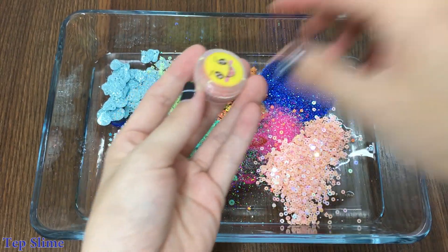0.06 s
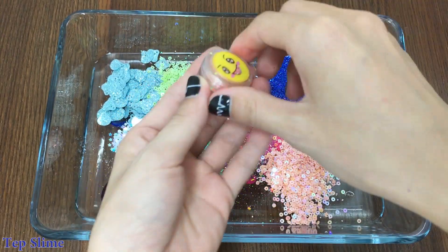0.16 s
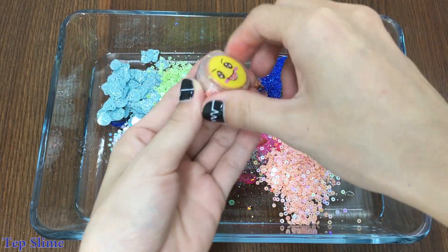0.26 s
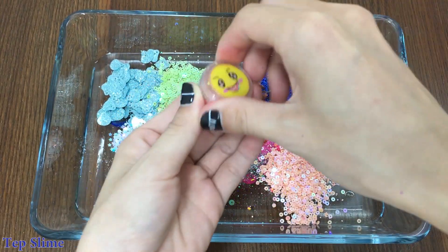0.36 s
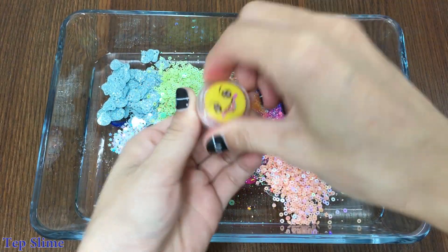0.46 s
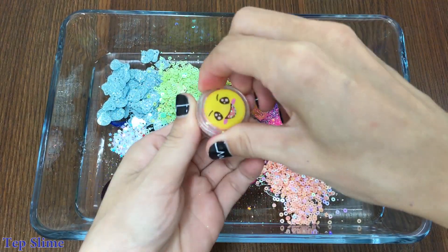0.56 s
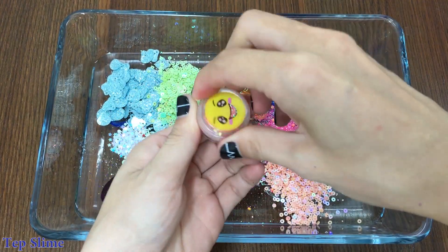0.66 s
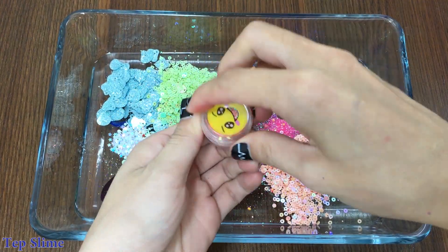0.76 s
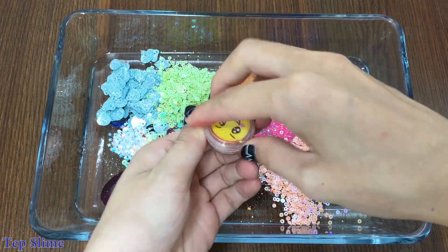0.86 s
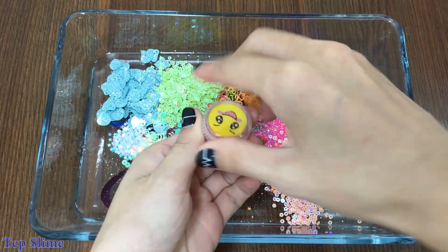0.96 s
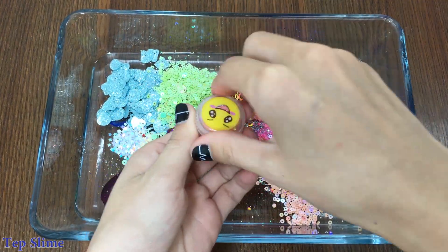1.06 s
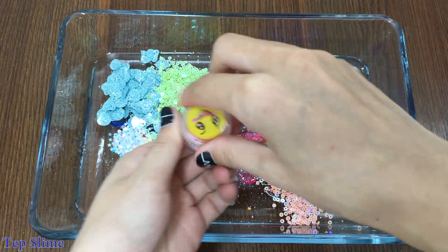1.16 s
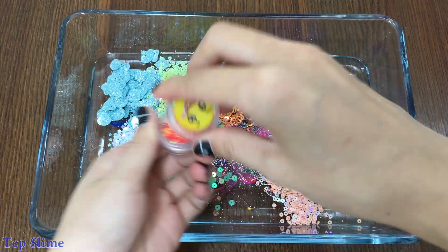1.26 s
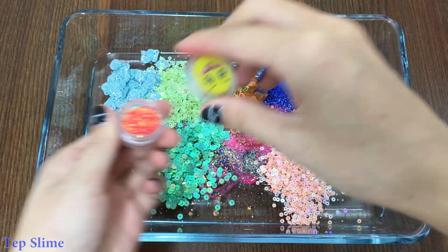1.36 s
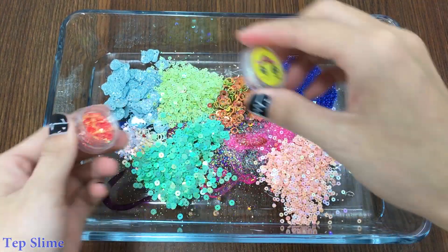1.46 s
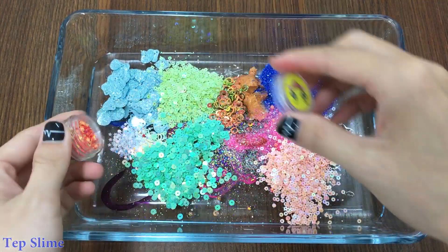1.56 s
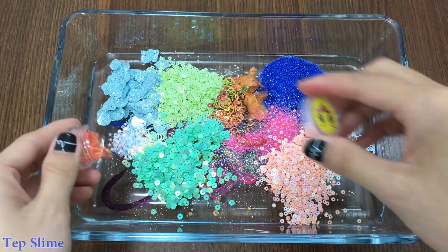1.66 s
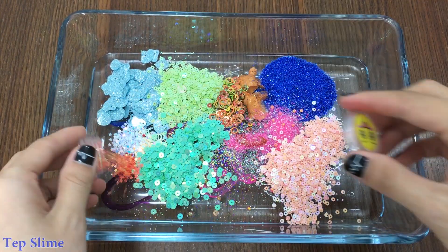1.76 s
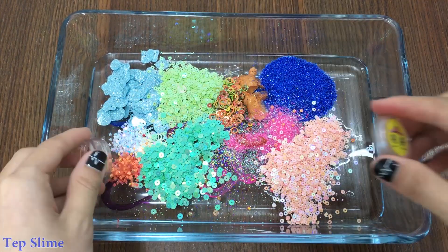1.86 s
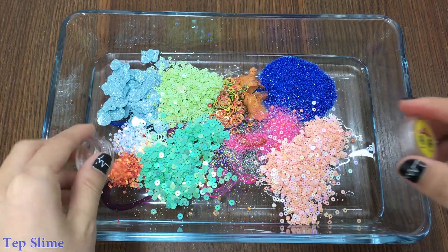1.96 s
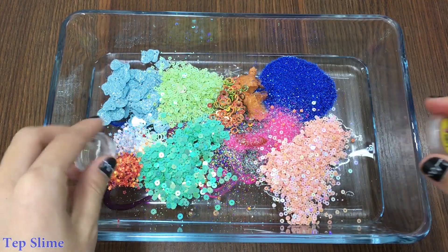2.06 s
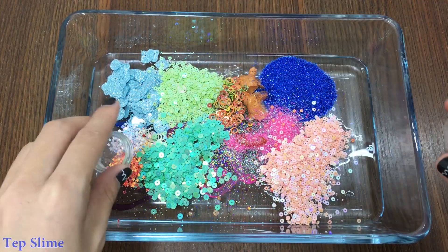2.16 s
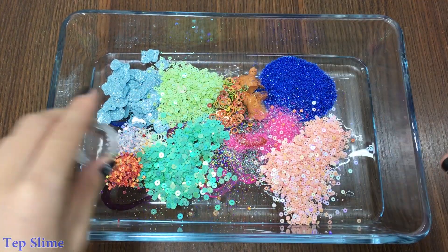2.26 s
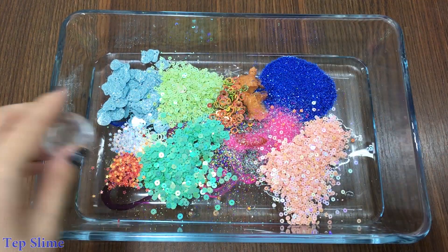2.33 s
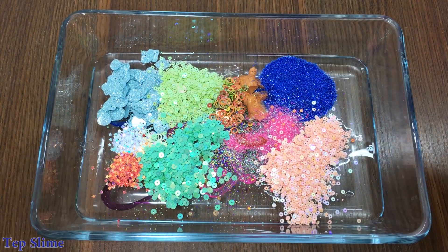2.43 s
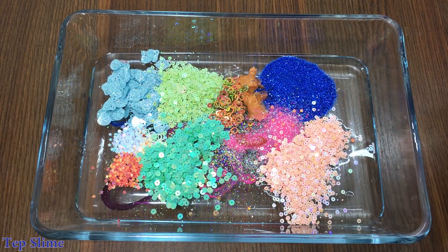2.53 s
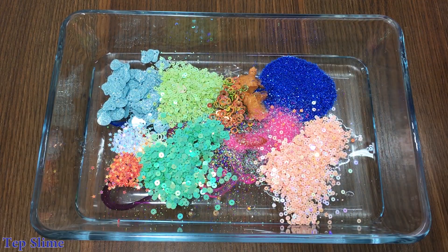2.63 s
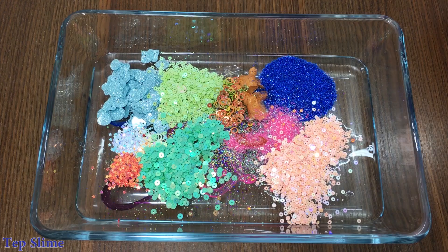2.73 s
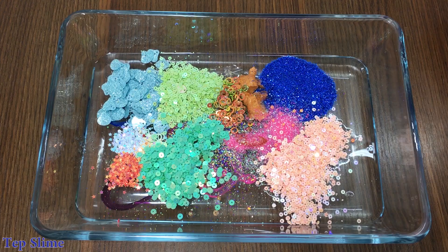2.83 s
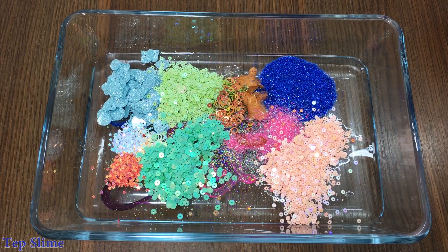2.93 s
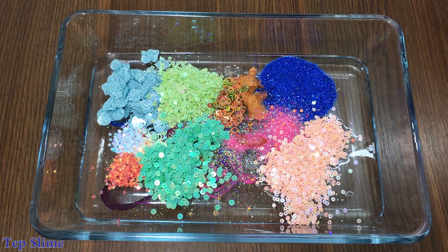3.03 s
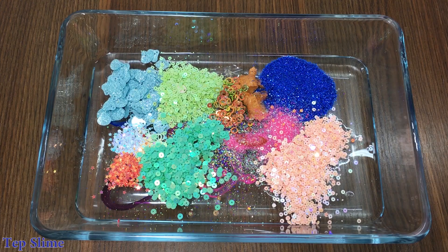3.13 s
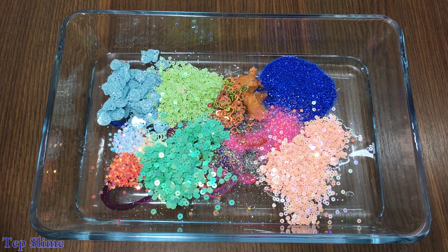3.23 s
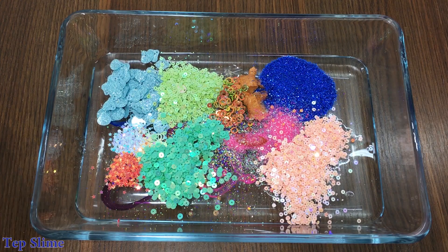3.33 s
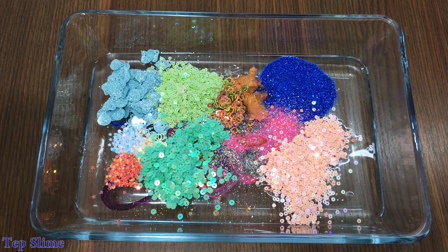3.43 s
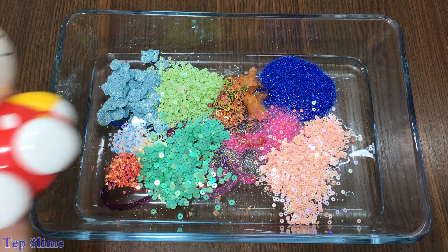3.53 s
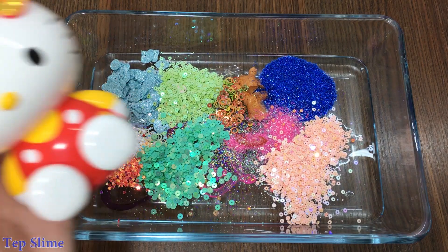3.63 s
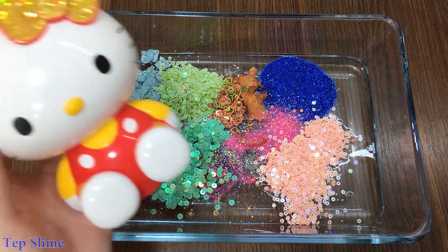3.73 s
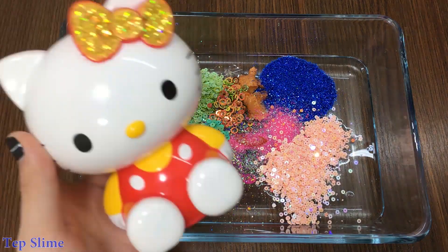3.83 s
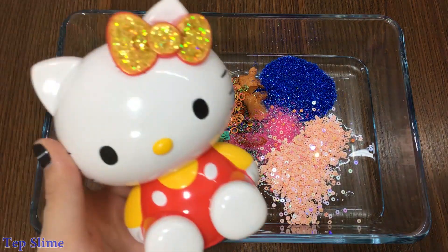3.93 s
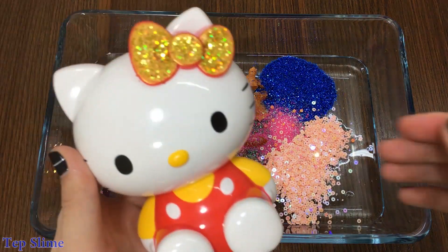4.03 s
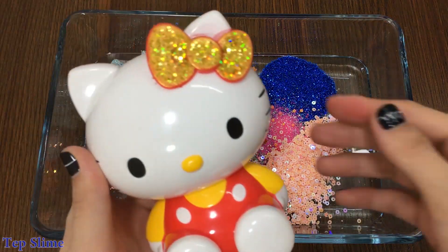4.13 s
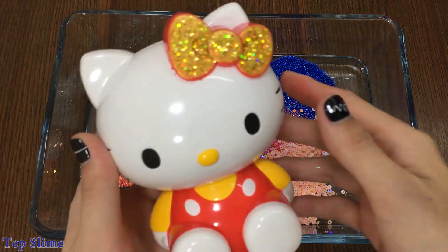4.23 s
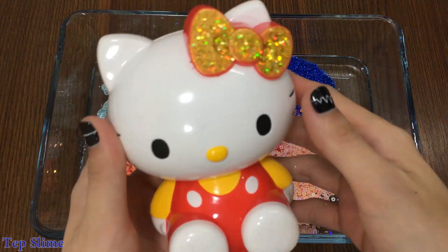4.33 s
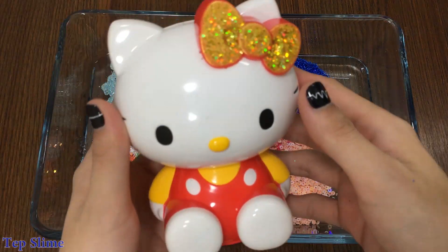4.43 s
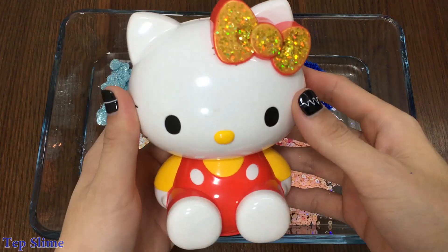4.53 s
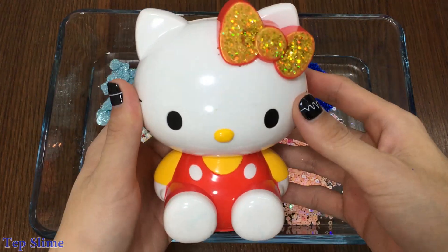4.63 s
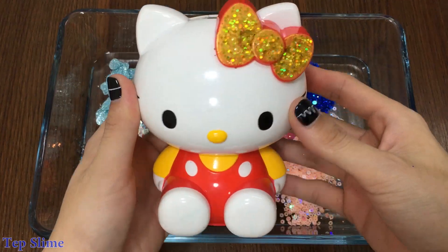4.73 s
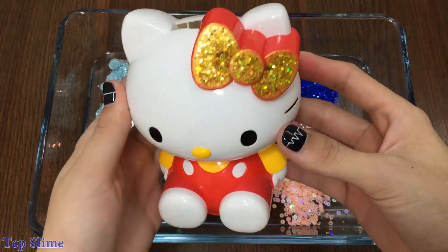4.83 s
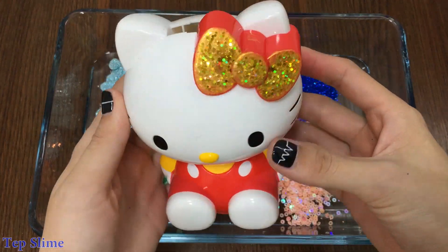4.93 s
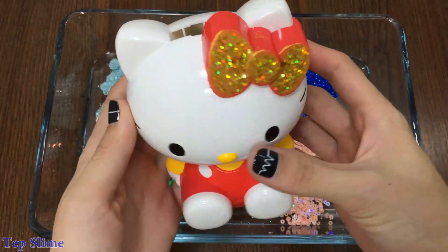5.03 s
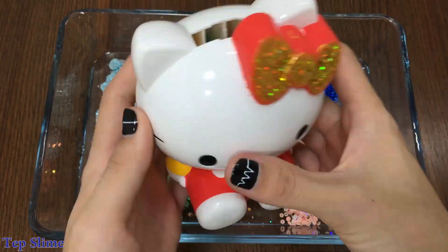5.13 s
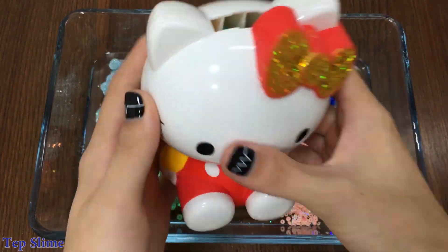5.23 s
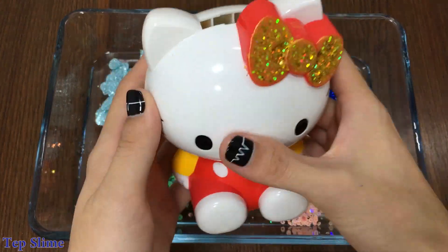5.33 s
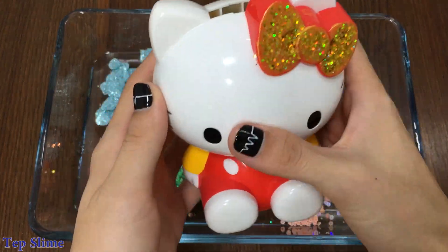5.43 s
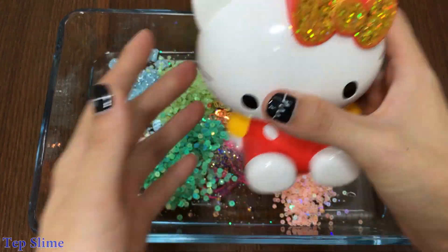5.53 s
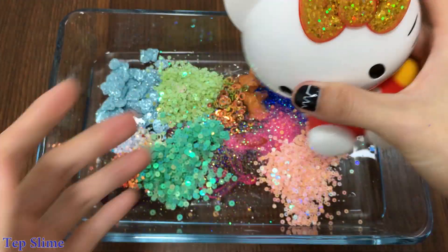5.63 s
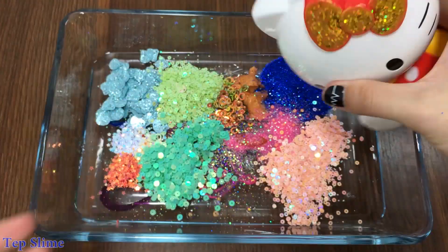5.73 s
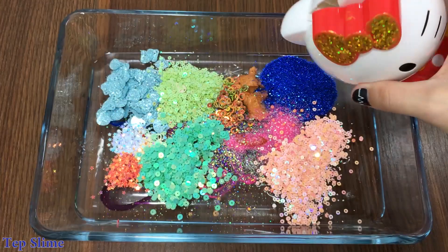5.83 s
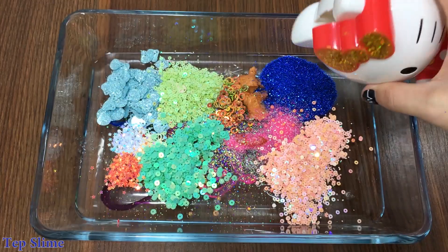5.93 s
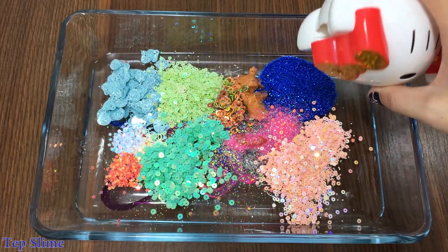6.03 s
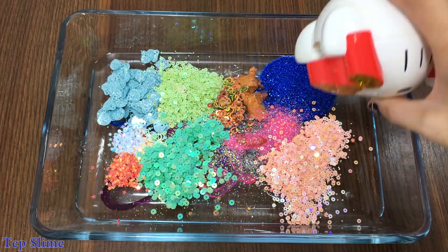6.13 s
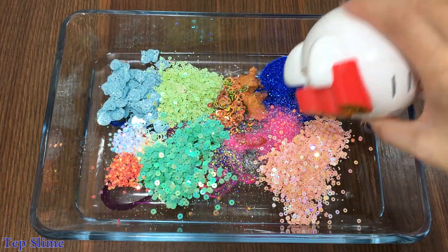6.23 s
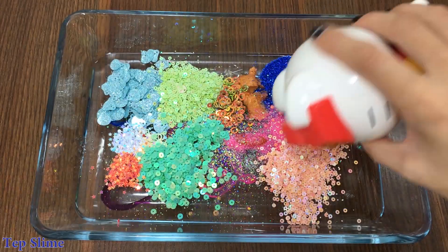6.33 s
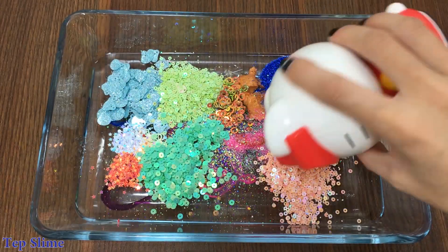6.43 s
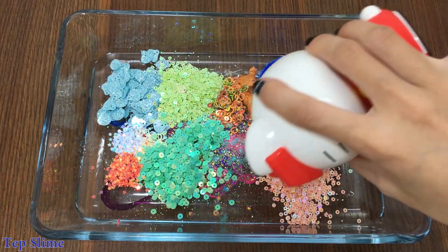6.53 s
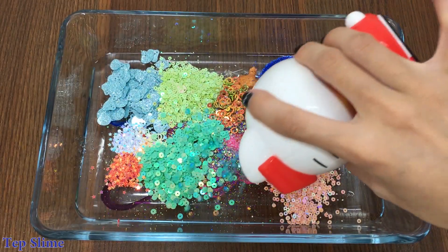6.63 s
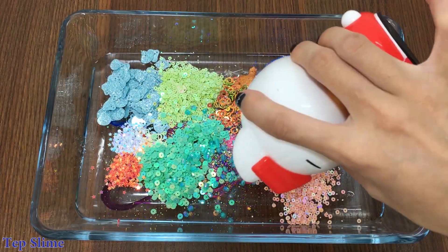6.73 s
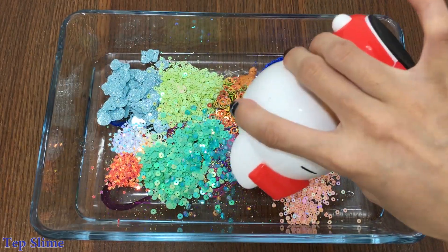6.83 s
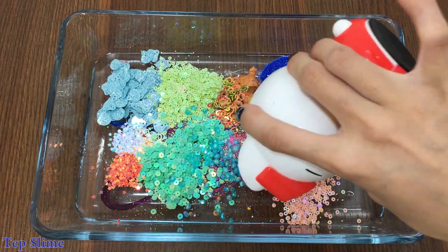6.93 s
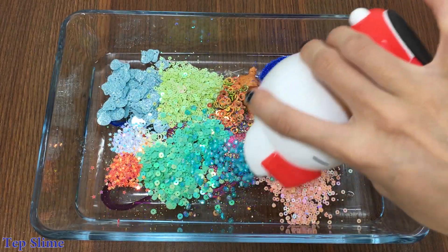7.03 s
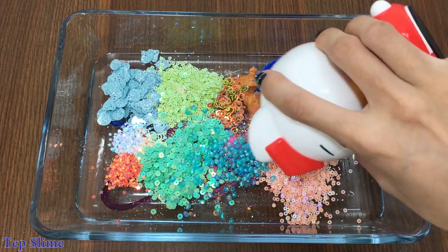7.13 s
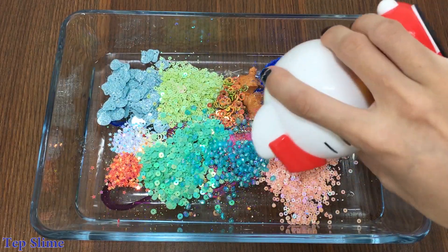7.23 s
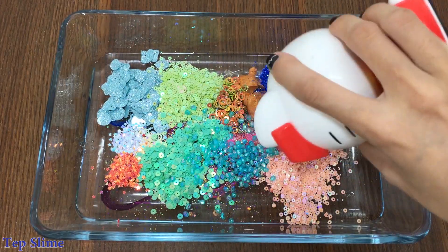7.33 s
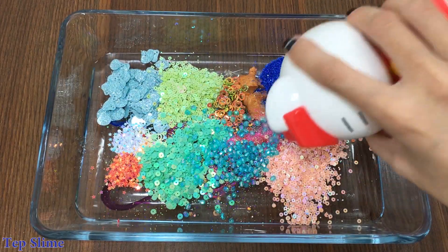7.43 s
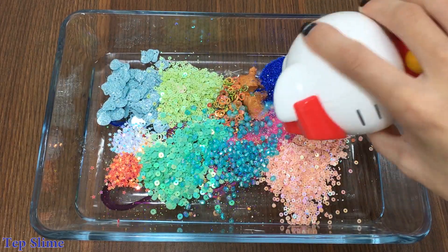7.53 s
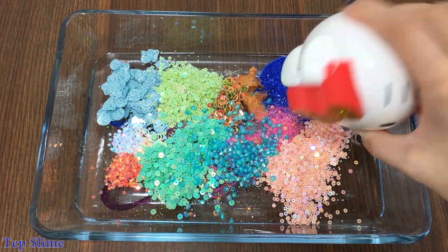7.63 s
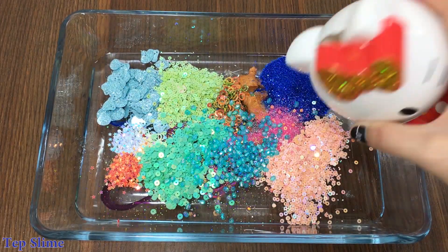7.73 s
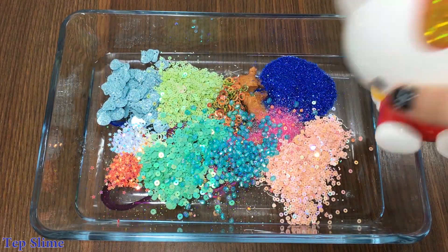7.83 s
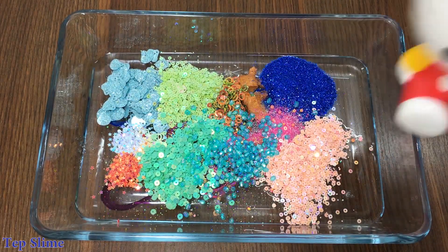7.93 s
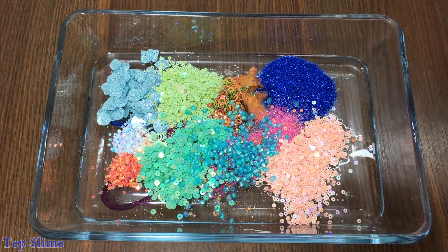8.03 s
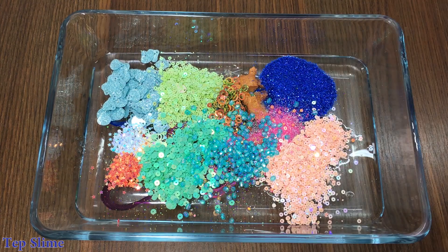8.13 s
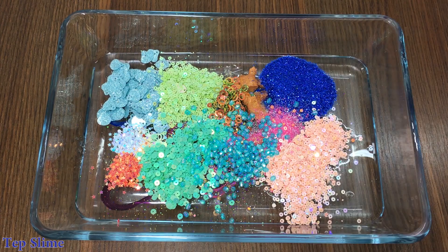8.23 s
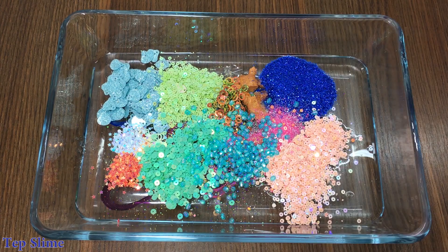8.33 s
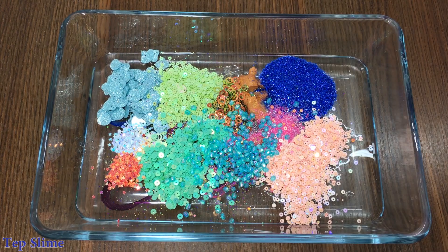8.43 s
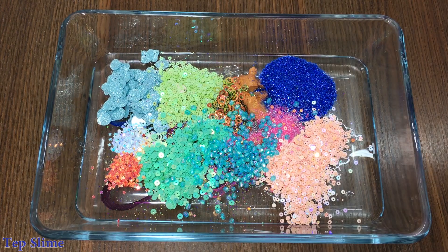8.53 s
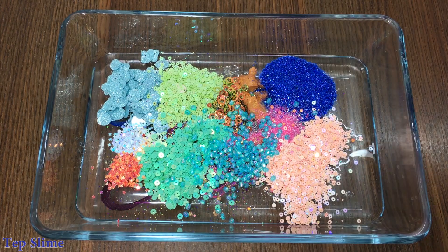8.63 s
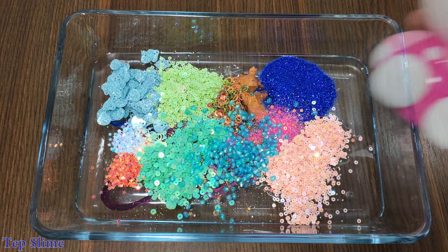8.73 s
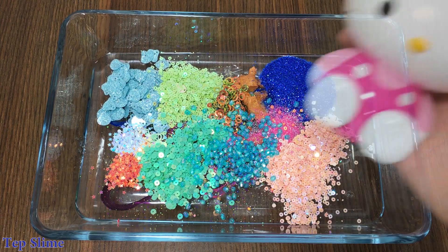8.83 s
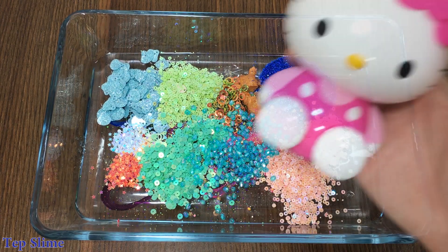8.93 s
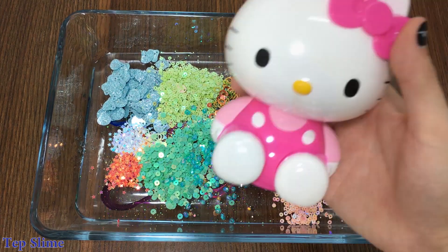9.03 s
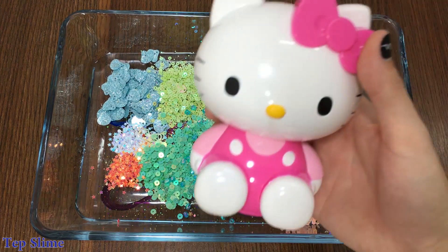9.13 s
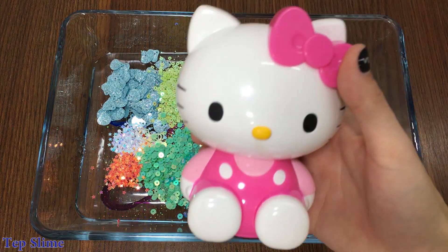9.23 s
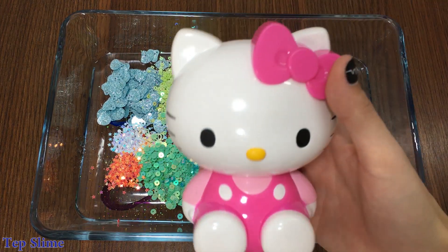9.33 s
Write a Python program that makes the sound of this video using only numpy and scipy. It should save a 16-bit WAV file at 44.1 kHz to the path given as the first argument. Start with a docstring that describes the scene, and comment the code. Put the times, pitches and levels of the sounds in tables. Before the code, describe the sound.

Small plastic lid clicks, followed by beads sliding and rattling inside hollow plastic figures and spilling out in a bright, close rush.

```python
"""A dull rustle fades. Fingers rub on a small plastic jar and twist its lid, which sticks and slips in
snaps that excite the cavity; sequins tick out. From about 2.6 s hollow plastic figures full of beads are
lifted, then turned, shaken and emptied close by: random impacts drive the resonances of the shell, merging
into a rush from which hard knocks stand out. Throughout, a small hard room reverberates over a low
rumble, hum and hiss."""
import sys
import numpy as np
from scipy import signal
from scipy.fft import rfft, irfft, next_fast_len
from scipy.io import wavfile
from scipy.ndimage import uniform_filter1d

SR = 44100
rng = np.random.default_rng(int(sys.argv[2]) if len(sys.argv) > 2 else 0)


def to_wav(sig):
    """Store sig (one row per channel, or 1-D mono) as 16-bit WAV at the path in sys.argv[1].

    Samples outside -1..1 are clipped; the rate is SR.
    """
    pcm = np.clip(np.atleast_2d(sig), -1, 1) * 32767
    pcm = np.round(pcm).astype(np.int16)
    wavfile.write(sys.argv[1], SR, pcm.T)  # frames by channels


N = 413216


def bead_stream(level_db, cavity_db, body_db, top_db, shell):
    """Shot noise: beads strike 30 spots on the wall at random, more often as the level rises."""
    count = len(level_db)
    hits_per_s = np.clip(3500 * gain_of(0.2 * (level_db + 34.5)), 100, 20000)
    strength = gain_of(3.74 * np.minimum(rng.exponential(1, count), 4))
    impulses = strength * (rng.random(count) < hits_per_s / SR) / np.sqrt(hits_per_s)
    spot = rng.integers(0, 30, count)
    force = sum(signal.oaconvolve(impulses * (spot == k), impact(t60=0.024))[:count] for k in range(30))
    low, middle, top = shell_bands(force, shell)
    bass, cavity, body = map(evened, split(low, 900, 1450))
    low = gain_of(-32) * bass + gain_of(cavity_db) * cavity + gain_of(body_db) * body
    taper = signal.windows.tukey(count, 1300 / count)
    return taper * gain_of(level_db) * (low + evened(middle) + gain_of(top_db) * evened(top))


# One curve a movement; cavity and body are relative to the middle band:
# (time [s], level [dB], air cavity [dB], shell body [dB])
SLIDE_CURVES = [
    [(2.88, -82, 4, -21), (2.884, -75, -7, 1), (3.034, -57, -19, -8), (3.22, -41, -19, -15),
     (3.272, -44.5, -18, -11.5), (3.4, -42.5, -17.5, -12), (3.424, -52, -32, -13), (3.68, -73.5, -9, -4)],
    [(4.6, -78, -1, -11), (4.612, -68, -1, -11), (4.626, -67, -17, -21), (4.636, -72, -8, -9),
     (4.662, -52, -16, -7), (4.682, -63, -17, -10), (4.822, -77, -9, -5), (4.86, -68, -19, -11)],
    [(5.39, -67.5, 5, -11), (5.4, -54.5, -11, -12), (5.436, -26.5, -16, -12.5), (5.512, -14, -16, -15),
     (5.588, -41, -14, -10.5), (5.86, -63, -8, -1), (5.87, -51, -9, -11)],
    [(7.9, -70, -19, -2), (7.958, -35, -29, -5.5), (8.052, -23.5, -12.5, -12.5),
     (8.094, -20.5, -20.5, -13.5), (8.192, -25, -15.5, -11.5), (8.266, -40, -23, -12),
     (8.326, -48.5, -13, -5), (8.37, -52, -16, -11)],
    [(8.62, -54, -13, -5), (8.642, -31.5, -27.5, -21), (8.752, -42, -9, -10.5), (8.784, -40, -18, -12),
     (9.01, -50, -13, -12.5), (9.056, -65, -11, -5.5), (9.126, -63.5, -10, -10), (9.2, -89, -5, -11)],
    [(5.85, -59, -26, -18), (5.87, -54.5, -5, -3), (5.96, -59, -20, -20), (6.05, -45, -20, -4.5),
     (6.27, -36, -36, -15), (6.36, -29.5, -30, -10), (6.45, -30, -29.5, -14), (6.74, -27.5, -20.5, -12),
     (6.93, -31, -20, -13.5), (7.11, -40, -26, -12), (7.13, -34.5, -18.5, -12.5), (7.58, -46.5, -21, -9.5),
     (7.62, -40.5, -19, -1.5), (7.71, -52, -10, -27), (7.92, -61, -16, -3)],
]
# Top band of each movement: (relative level [dB])
SLIDE_TREBLE = [-5.5, -18, -4.5, -4.5, -5.5, -4]
def bead_slides():
    """Sustained excitation: beads slide along the shell for as long as the figure moves."""
    for curve, top_db in zip(SLIDE_CURVES, SLIDE_TREBLE):
        times, *columns = np.transpose(curve)
        t = np.arange(times[0], times[-1], 1 / SR)
        levels_db = [np.interp(t, times, column) for column in columns]
        yield times[0], bead_stream(*levels_db, top_db, shell_response(times[0]))


# Jolts of the hand: (peak time [s], level [dB], rise [s], hold [s], fall [s])
JOLTS = [(2.978, -57, .02, .004, 0.046), (3.066, -49, 0.032, .004, 0.036), (3.22, -60, .1, .01, .1),
         (3.732, -64.5, .12, .02, 0.3), (9.1, -63, .03, .004, .06), (6.588, -27.5, 0.1, .05, 0.77),
         (4.545, -66, 0.044, .005, .04), (4.972, -61.5, 0.25, 0.059, 0.18),
         (5.114, -62, 0.026, .005, 0.043), (5.15, -77, .03, .005, .06), (5.9, -42.5, 0.011, 0.0027, 0.025),
         (6.325, -36, 0.025, .02, 0.25), (7.042, -32, 0.042, 0.0081, 0.13),
         (7.149, -24, 0.027, 0.0038, 0.063), (7.24, -29.5, 0.017, 0.0069, 0.089),
         (7.274, -29, 0.05, 0.016, 0.15), (7.406, -30.5, .08, 0.0069, 0.04),
         (7.507, -26.5, 0.036, .005, .07), (7.624, -28.5, 0.13, 0.0077, 0.22),
         (7.76, -43.5, 0.033, .004, 0.035), (8.395, -42.5, 0.045, .005, 0.093),
         (8.449, -52, .1, 0.069, 0.12), (8.566, -32, 0.012, 0.0023, 0.039)]
def bead_rushes():
    """Inertia: every jolt throws a short rush of beads against the wall."""
    for start, end in ((2.5, FAR_UNTIL_S), (FAR_UNTIL_S, N / SR)):
        t = np.arange(start, end, 1 / SR)
        level_db = np.max([swell(t, *jolt) for jolt in JOLTS], axis=0)
        shell = shell_response(start)
        yield start, bead_stream(level_db, cavity_db=-25, body_db=-21.5, top_db=-6.5, shell=shell)


# Hard single hits: (time [s], level [dB], spot frequency [Hz], shell body [dB], top band [dB])
BEAD_KNOCKS = [(2.6534, -39.5, 3740, 5, -4), (2.9761, -41, 5940, 0, 2), (3.0235, -30, 10200, -9, 2),
               (3.058, -24.5, 13800, -3, -8), (3.0979, -24, 14200, 7, -9), (3.1246, -31, 8290, -3, 4),
               (3.1577, -27.5, 6930, 7, -5), (3.1872, -25.5, 5290, -3, -3), (3.2121, -26, 8900, -8, 6),
               (3.3297, -25, 9200, 3, 2), (3.3444, -24.5, 8730, 5, 2), (3.3667, -29, 13600, -3, 4),
               (3.3949, -23, 8650, 2, 3), (3.4411, -25.5, 8620, -9, 2), (3.498, -24.5, 14600, -3, -5),
               (3.54, -33.5, 7900, 0, 2), (4.623, -45, 5950, 10, 2), (4.6558, -38, 5070, 2, -8),
               (4.718, -48, 5930, 9, -4), (5.1084, -42, 8330, -1, 2), (5.1517, -46.5, 15000, -6, 0),
               (5.3537, -51, 4460, -3, -2), (5.404, -37, 8730, 3.5, 5.5), (5.4282, -24, 9980, 9.5, 0.5),
               (5.435, -17, 7150, 0, -1), (5.4435, -15.5, 6440, 3.5, 2.5), (5.6545, -39, 7080, -3, 0),
               (5.874, -33, 8230, 4, -4), (5.9015, -23, 10000, 0, 3), (5.9239, -32, 3840, -1, -3),
               (5.9587, -32, 10600, -7, 2), (5.976, -37, 8580, 0, 2), (6.003, -25, 8840, 5, 0),
               (6.0253, -21, 13300, -9, 0), (6.0438, -18.5, 13200, -8, -4),
               (6.0657, -12.5, 14000, 2.5, -1.5), (6.0994, -25.5, 6660, -8.5, 2), (6.118, -29, 6720, 11, 6),
               (6.134, -24, 7210, 0, 4), (6.1549, -19, 12800, 0, -4), (6.1887, -20.5, 7400, 4, 7),
               (6.2053, -17, 8550, 2, 4), (6.224, -19, 10200, 2, -1), (6.2574, -21, 7360, -12, 8),
               (6.2777, -22, 9920, 8, 6), (6.2926, -22.5, 14900, -18, 8), (6.303, -12.5, 7450, 3, 7),
               (6.3262, -14, 7300, -1, 4), (6.39, -28, 13700, -5, 4), (6.43, -15, 9700, -2, 2),
               (6.5365, -15, 6310, 2, 2), (6.5737, -15, 12300, 5, 3), (6.5864, -14, 9990, -6, 0),
               (6.6746, -14, 7580, -3, 2), (6.816, -19, 10200, -1, 2), (6.918, -16, 10200, 1, -3),
               (7.0322, -15.5, 10200, -18, 3), (7.0843, -24, 11800, -10.5, 7), (7.124, -25, 5910, 8, 4),
               (7.135, -23, 9600, 1, 2), (7.1504, -14, 9900, -12, 5), (7.233, -14.5, 6500, -1.5, 0),
               (7.2669, -18, 6300, -1, 2), (7.2842, -14, 6050, -7.5, 7), (7.3711, -21, 9300, -10.5, -2),
               (7.3988, -17.5, 6260, -3, 9), (7.463, -27, 3780, -6, 6), (7.4881, -20.5, 10200, 2, -2),
               (7.5048, -16, 10200, -13, 2), (7.5523, -23.5, 4550, -2, 2), (7.5882, -27, 4500, -5, 5),
               (7.6225, -12, 5770, -7, 4), (7.66, -17, 8540, -8, 5), (7.7149, -26, 6730, -8, 2),
               (7.7572, -23.5, 5640, -6, 6), (7.797, -39, 12100, 1, 6), (7.8385, -33, 7340, 0, 2),
               (7.868, -35, 10900, 3, 2), (7.9189, -32.5, 6670, -13.5, -2), (7.9398, -28, 6130, 5, -2),
               (7.959, -26.5, 6980, -4, 2), (8.3723, -31.5, 10700, 14, 2), (8.3993, -24, 13900, -4, 7.5),
               (8.4192, -25.5, 3530, 3.5, 2), (8.4512, -29.5, 5910, 3, -4), (8.4782, -30, 10500, 2, 3),
               (8.5064, -46, 4650, 11, 2), (8.5245, -37, 4570, 3, 4), (8.5651, -26.5, 8040, 18, 2),
               (8.5916, -31, 8990, 13, 2), (8.6164, -30, 8920, 5.5, 2), (8.6348, -22, 7800, -3, 7),
               (8.7075, -26, 10200, -7, 4), (8.766, -39, 8020, -8, 3), (8.7849, -23, 8080, -14, 2),
               (8.8424, -22.5, 7640, 4, -2), (8.9094, -25, 7160, 0.5, 2), (8.9647, -24, 8250, 5, 3.5),
               (9.011, -28, 13000, 5, -5), (9.1166, -41, 4260, -6, 0)]
def bead_knocks():
    """Point excitation: the spot that a bead strikes favours its own band of frequencies."""
    for start, db, spot_hz, body_db, top_db in BEAD_KNOCKS:
        shell = shell_response(start)
        force = impact(t60=0.025)
        force += 1.64 * band(force, 0.877 * spot_hz, 1.122 * spot_hz)
        body, middle, top = shell_bands(force, shell)
        knock = gain_of(body_db) * body + middle + gain_of(top_db) * top
        yield start, gain_of(db) * knock / abs(middle + top).max()


def impact(t60):
    """Contact transient: a quick tick, then scattered waves damped in the wall."""
    t = np.arange(2600) / SR
    decay = gain_of(-60 * t / t60) + np.exp(-t / 0.0015)
    attack = 1 - np.exp(-t / 0.00039)
    return rng.standard_normal(len(t)) * decay * attack


# Broad spectrum of the shell, close by and further off at another angle: (frequency [Hz], level [dB])
NEAR_SPECTRUM = [(260, -66.5), (450, -26), (908, -22), (1360, -10), (1490, -9), (1800, -5.5), (2230, -5.5),
                 (2650, -11.5), (3500, -6.5), (4430, -2.5), (5460, -5), (10100, 1.5), (11300, -4.5),
                 (14800, -4.5), (16000, -9)]
FAR_SPECTRUM = [(410, -64), (700, -19), (852, -20), (1600, -9), (2840, -12), (3740, -6.5), (7690, -3),
                (8990, 2.5), (11400, -3.5), (14000, -1), (16000, -5)]
# Shell modes: (frequency [Hz], bandwidth [Hz], level [dB])
SHELL_RESONANCES = [(1080, 12, 4), (1293, 170, -2), (1754, 54, 2.5), (1960, 50, -10.5), (2218, 22, 5.5),
                    (3487, 100, 2), (4500, 120, -4.5), (5950, 93, 2.5), (6430, 77, 1.5), (7120, 270, -1),
                    (7980, 60, 2), (8550, 140, -7.5), (8750, 29, -8.5), (10200, 310, -20),
                    (12400, 230, -0.5), (14200, 88, -1.5)]
FAR_UNTIL_S, GRIP_DB, GRIP_ABOVE_HZ = 4.0, -5, 1900
def shell_response(time_s):
    """Modal resonance: the hollow shell radiates little bass; the grip randomly weakens upper modes."""
    hz = abs(np.fft.fftfreq(4096, 1 / SR))
    colour = gain_of(value_at(FAR_SPECTRUM if time_s < FAR_UNTIL_S else NEAR_SPECTRUM, hz))
    modes = 0
    for mode_hz, width, db in SHELL_RESONANCES:
        grip_db = GRIP_DB * rng.random() * (mode_hz > GRIP_ABOVE_HZ)
        modes += gain_of(db + grip_db) / (1 + (2 * (hz - mode_hz) / width) ** 2)
    radiation = 0.23 + 1.2 / (1 + (930 / (hz + 1)) ** 12)
    log_gain = np.log(colour * (1 + modes) * radiation + 1e-5)
    minimum_phase = -signal.hilbert(log_gain).imag
    return np.fft.ifft(np.exp(log_gain + 1j * minimum_phase)).real[:2048]


def shell_bands(force, shell):
    """Forced vibration: force convolved with the shell's response, as body, middle and top bands."""
    return split(signal.oaconvolve(force, shell)[:len(force)], 2900, 11200)


# Slips of the lid: (time [s], level [dB], cavity frequency [Hz], crack [dB], crack tilt [dB/octave],
# cavity 60 dB decay time [s])
LID_SLIPS = [(0.663, -45.5, 5100, -8, 14, 0.0089), (0.671, -33, 5250, -21, -3, 0.0044),
             (0.761, -51, 1470, -9, -5, 0.005), (0.817, -48, 1590, -7, -5, 0.012),
             (0.825, -42, 1410, -6, 0, 0.0041), (0.867, -49, 1610, -14, 10, 0.0044),
             (1.0217, -52, 1680, -3, 2, 0.0065), (1.071, -34.5, 1620, -13, -7, 0.004),
             (1.1497, -50, 1620, -7, -14, 0.012), (1.2512, -15, 1724, -5.5, 0, 0.0064),
             (1.293, -36, 1870, -10, -2, 0.0064), (1.311, -38, 1930, -14, 4, 0.005),
             (1.37, -25, 2390, -8.5, -6.5, 0.0056), (1.391, -35.5, 3800, -12, -2, 0.0038)]
# Modes of the lid: (frequency [Hz], level [dB])
LID_MODES = [(1300, -43), (2000, -3), (2900, 5), (3400, -2.5), (4600, -1), (5600, 2), (7250, -3),
             (8950, -7), (10400, -3.5), (13200, -28), (15000, -6)]
def lid_snaps():
    """Stick-slip friction: each release rings the jar's cavity and the heavily damped lid modes."""
    t = np.arange(600) / SR
    for start, db, cavity_hz, crack_db, tilt_db, t60 in LID_SLIPS:
        attack = 1 - np.exp(-t / 0.00037)
        cavity = np.sin(2 * np.pi * cavity_hz * t) * gain_of(-60 * (t / t60) ** 2) * attack
        detune = rng.uniform(0.91, 1.127, len(LID_MODES))
        crack = 0
        for k, (hz, mode_db) in enumerate(LID_MODES):
            envelope = gain_of(mode_db + tilt_db * np.log2(hz / 3000) - 0.37 * hz * t)
            crack += (-1) ** k * envelope * np.sin(2 * np.pi * hz * detune[k] * t)
        snap = cavity + gain_of(crack_db - 60 * t / 0.0059) * crack
        yield start, gain_of(db) * band(snap, 690, 17800)  # a small jar radiates no bass


# Soft grainy hisses: finger rubs, and at 1.269 s the ringing tail after the loudest lid snap:
# (peak time [s], level [dB], rise [s], hold [s], fall [s], middle band [dB], low band [dB])
GRAINY_HISSES = [(0.317, -66.5, .08, 0.018, .25, -14, -28), (0.664, -48, 0.0042, 0.0023, 0.082, -8, -4),
                 (0.836, -69.5, 0.075, .02, 0.63, 0.5, 5), (1.269, -72, .01, 0.13, .1, 3, 13),
                 (1.391, -49.5, .008, .002, .03, -13, -8), (1.94, -68, .1, 0.23, .1, -13, -31)]
def grainy_hisses():
    """Amplitude-modulated noise: finger rubs, and the ringing tail after the loudest lid snap."""
    for peak_s, *shape, middle_db, low_db in GRAINY_HISSES:
        t = np.arange(peak_s - 0.2, peak_s + 0.6, 1 / SR)
        white = rng.standard_normal(len(t))
        grain_db = 2 * evened(uniform_filter1d(rng.standard_normal(len(t)), 150))
        grainy = band(white * gain_of(grain_db), 1200, 17000)
        low, middle, high = map(evened, split(grainy, 3500, 7000))
        hiss = high + gain_of(middle_db) * middle + gain_of(low_db) * low
        yield t[0], gain_of(swell(t, peak_s, *shape)) * hiss


# Modes of the flakes: (frequency [Hz], bandwidth [Hz])
FLAKE_MODES = [(12150, 230), (13650, 300)]
# One swell a mode: (peak time [s], level [dB], rise [s], hold [s], fall [s])
FLAKE_SWELLS = [(1.782, -63.5, .03, 0.081, 0.43), (1.86, -65, 0.22, .04, .5)]
def sequins():
    """Damped free vibration: thin flakes collide at random and ring briefly at two high pitches."""
    t = np.arange(1.6, 2.4, 1 / SR)
    age = np.arange(500) / SR
    for (hz, width), shape in zip(FLAKE_MODES, FLAKE_SWELLS):
        ticks = rng.standard_normal(len(t)) * (rng.random(len(t)) < 700 / SR)
        ring = np.exp(-np.pi * width * age) * np.sin(2 * np.pi * hz * age)
        yield t[0], gain_of(swell(t, *shape)) * evened(signal.oaconvolve(ticks, ring)[:len(t)])


# Decay of the room: (frequency [Hz], reverberation time [s])
ROOM_DECAY = [(800, 0.56), (2100, 0.81), (5600, 0.68), (14700, 0.56)]
def reverberation(x):
    """Absorption: sparse reflections of random sign die away, each band at its own rate."""
    reflections = np.zeros(SR)
    slots = np.arange(120, SR - 20, 20)
    reflections[slots + rng.integers(0, 20, len(slots))] = rng.choice([-1., 1.], len(slots))
    hz, t, spectra = signal.stft(reflections, SR, nperseg=256)
    decay = gain_of(-60 * t / value_at(ROOM_DECAY, hz)[:, None])
    tail = signal.istft(spectra * decay, SR, nperseg=256)[1]
    return signal.fftconvolve(x, tail / np.linalg.norm(tail))[:N]


def hum(t, hz=49.1, drift_hz=1.5, throb_hz=4.92):
    """Modulation: a low tone wavers in amplitude and phase, and throbs from about 4.5 to 5.6 s."""
    throb = ramp(t, 4.5, 0.2, 1.1, 0.18) * np.cos(2 * np.pi * throb_hz * (t - 4.23))
    drift = uniform_filter1d(rng.standard_normal((2, N)), int(SR / drift_hz))
    phasor = 2.9 + evened(drift[0]) + 1j * evened(drift[1])
    tone = evened((phasor * np.exp(2j * np.pi * hz * t)).real)
    return (1 + 0.75 * throb) * tone


# Noise spectra: (frequency [Hz], relative spectral level [dB])
RUMBLE_SPECTRUM = [(35, -25.5), (60, -6.5), (75, -6.5), (93, -7.5), (118, -10), (135, -14.5), (156, -13.5),
                   (194, -12.5), (231, -21), (264, -22), (308, -21), (419, -29), (483, -28.5), (525, -32),
                   (700, -32.5), (910, -46), (1540, -120)]
HISS_SPECTRUM = [(180, -23), (300, -1), (392, -6), (494, -13.5), (574, -12.5), (994, -13.5), (1120, -12),
                 (1810, -15.5), (5250, -20.5), (7690, -19.5), (16000, -24.5)]
RUSTLE_SPECTRUM = [(150, -33), (250, 0), (593, -7.5), (651, -13), (793, -11), (3000, -33), (3900, -61),
                   (6600, -120)]
# Fuzzy tones in the rumble: (frequency [Hz], bandwidth [Hz], level [dB])
RUMBLE_TONES = [(79.5, 20, -65.5), (109.8, 10, -68.5)]
# Two dips and a slight lift of the lows: (time [s], onset [s], hold [s], return [s], rumble [dB], hum [dB])
BASS_SHIFTS = [(1.556, 0.076, 0.25, 0.28, -7, -18), (6.15, .07, .28, 0.16, -8, -15),
               (7.1, .1, .05, .4, 0.5, 1)]
def background():
    """Spectrally shaped noise: rumble, hiss and an opening rustle that decays, joined by the hum."""
    t = np.arange(N) / SR
    deep_db = sum(db * ramp(t, *timing) for *timing, db, _ in BASS_SHIFTS)
    hum_db = -56 + sum(db * ramp(t, *timing) for *timing, _, db in BASS_SHIFTS)
    humming = gain_of(hum_db) * hum(t)
    tones = sum(gain_of(db) * evened(band(rng.standard_normal(N), hz - width / 2, hz + width / 2))
                for hz, width, db in RUMBLE_TONES)
    deep, middle, high = split(gain_of(-59.5) * noise(RUMBLE_SPECTRUM) + tones, 178, 1000)
    rumble = gain_of(deep_db) * deep + middle + high
    hiss = gain_of(-67.5) * noise(HISS_SPECTRUM)
    rustle = gain_of(-59 - 60 * t / 0.73) * noise(RUSTLE_SPECTRUM)
    return rumble + humming + hiss + rustle


def noise(spectrum):
    """Filtered white noise with a given spectrum, at unit rms."""
    hz = np.fft.rfftfreq(N, 1 / SR)
    return evened(irfft(rfft(rng.standard_normal(N)) * gain_of(value_at(spectrum, hz)), N))


def band(x, low_hz, high_hz):
    """Butterworth band-pass filter."""
    return signal.sosfilt(signal.butter(2, [low_hz, high_hz], "band", fs=SR, output="sos"), x)


def split(x, low_hz, high_hz):
    """Complementary filters: low, middle and high parts that add up to the whole."""
    size = next_fast_len(len(x) + 512)
    hz, spectrum = np.fft.rfftfreq(size, 1 / SR), rfft(x, size)
    low = 1 / (1 + (hz / low_hz) ** 8)
    high = 1 / (1 + (high_hz / (hz + 1)) ** 16)
    return [irfft(spectrum * mask, size)[:len(x)] for mask in (low, 1 - low - high, high)]


def swell(t, peak_s, db, rise_s, hold_s, fall_s):
    """Exponential growth and decay, as a level: up 43.5 dB over the rise, down as much over the fall."""
    before = (peak_s - t) / rise_s
    after = np.maximum(t - peak_s - hold_s, 0) / fall_s
    return db - 43.5 * np.maximum(before, after)


def ramp(t, full_s, rise_s, hold_s, fall_s):
    """Trapezoidal envelope that reaches 1 at full_s."""
    return np.interp(t, np.cumsum([full_s - rise_s, rise_s, hold_s, fall_s]), [0, 1, 1, 0])


def value_at(points, hz):
    """Interpolation on a logarithmic frequency axis."""
    points_hz, values = np.transpose(points)
    return np.interp(np.log(hz + 1), np.log(points_hz + 1), values)


def gain_of(db):
    """Decibels to amplitude ratio."""
    return 10 ** (np.asarray(db) / 20)


def evened(x):
    """Normalisation to unit rms."""
    return x / np.sqrt(np.mean(x ** 2) + 1e-20)


def scene():
    """Superposition: direct sound, its reverberation and the background add in one channel."""
    direct = np.zeros(N)
    for source in (bead_slides, bead_rushes, bead_knocks, lid_snaps, grainy_hisses, sequins):
        for start, sound in source():
            span = direct[round(start * SR):][:len(sound)]
            span += sound[:len(span)]
    return (direct + gain_of(-13) * reverberation(direct) + background())[None]


# Dips in the microphone's response: (frequency [Hz], width [Hz], level [dB])
MICROPHONE_DIPS = [(8660, 1500, -3), (11420, 370, -3)]
def record(dry, shelf_hz=15850, limit_hz=16828):
    """Frequency response: two microphone dips, a much weaker topmost treble, then the band limit."""
    hz = np.fft.rfftfreq(N, 1 / SR)
    response_db = sum(db * np.exp(-((hz - centre) / width) ** 2) for centre, width, db in MICROPHONE_DIPS)
    coloured = irfft(rfft(dry) * gain_of(response_db), N)
    shelf_filter = signal.firwin(511, shelf_hz, window=("kaiser", 9), fs=SR)[None]
    limit_filter = signal.firwin(511, limit_hz, window=("kaiser", 9), fs=SR)[None]
    low = signal.oaconvolve(coloured, shelf_filter, "same")
    shelved = low + gain_of(-42) * (coloured - low)
    return signal.oaconvolve(shelved, limit_filter, "same")


dry = scene()
out = record(dry)
to_wav(out)
```